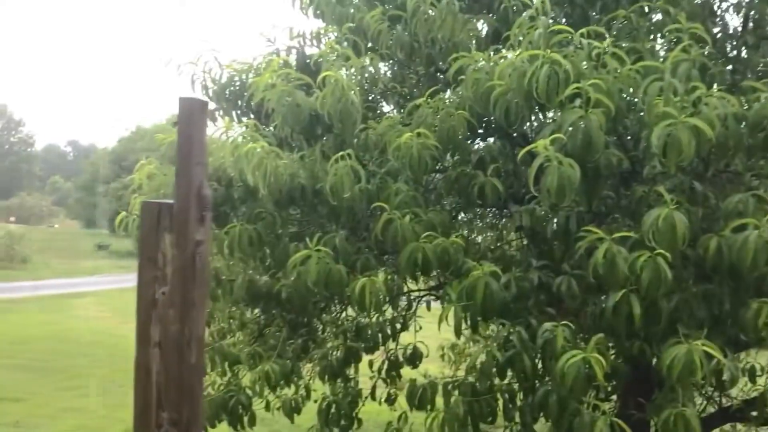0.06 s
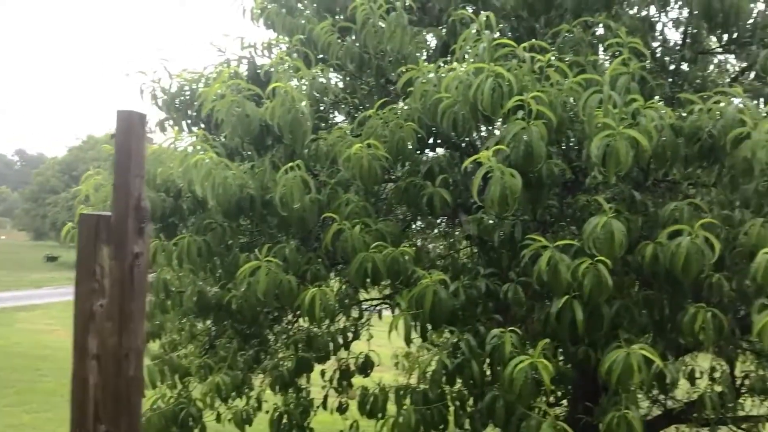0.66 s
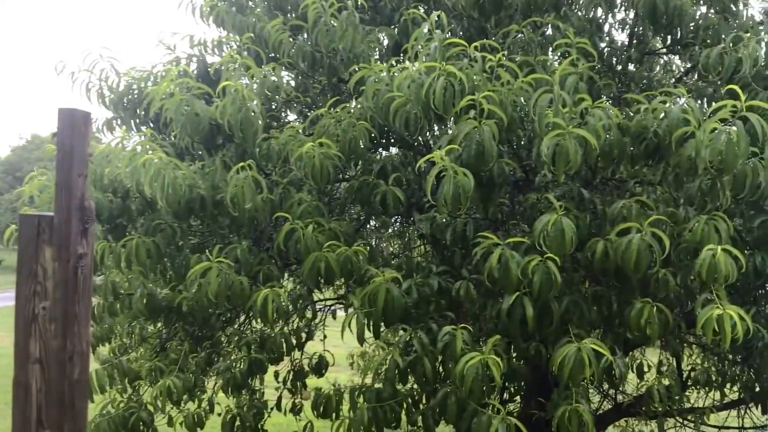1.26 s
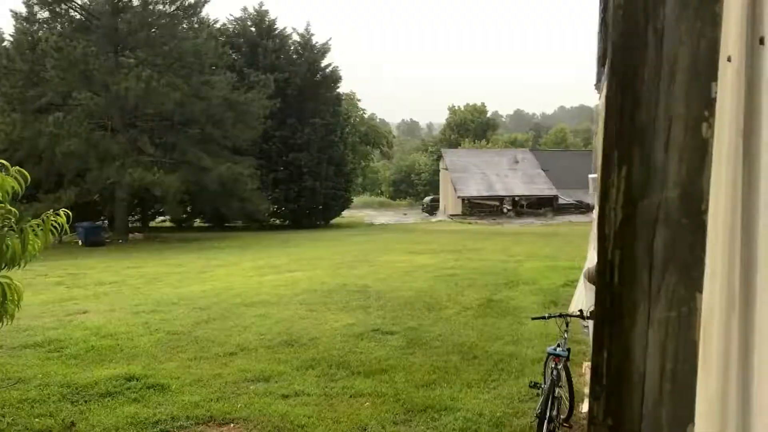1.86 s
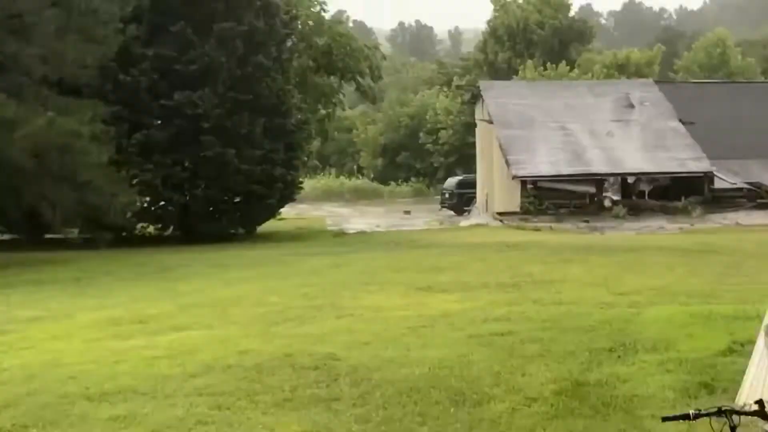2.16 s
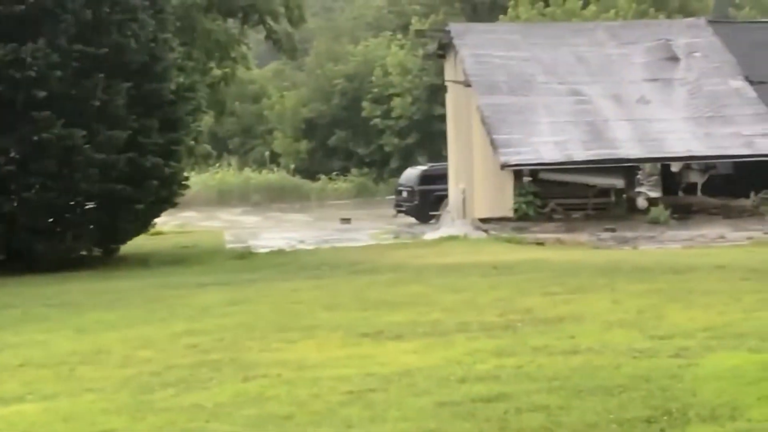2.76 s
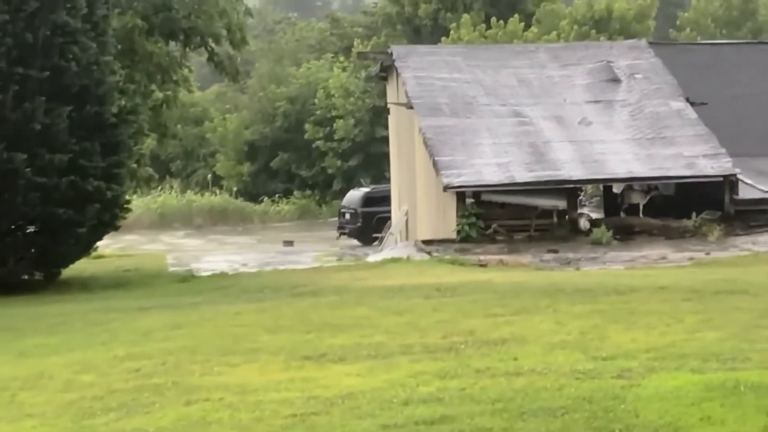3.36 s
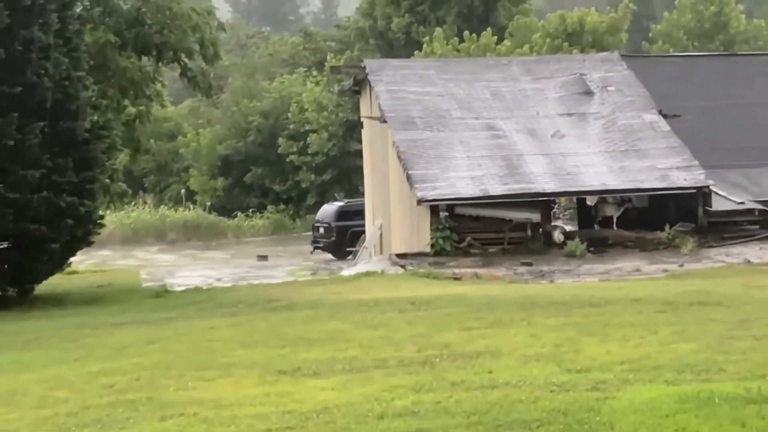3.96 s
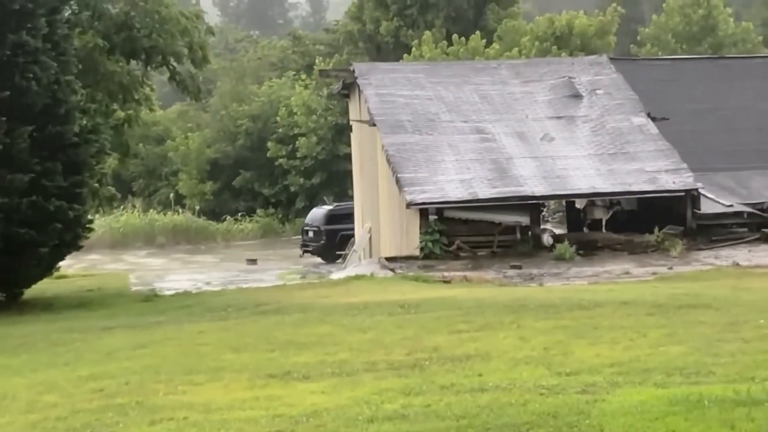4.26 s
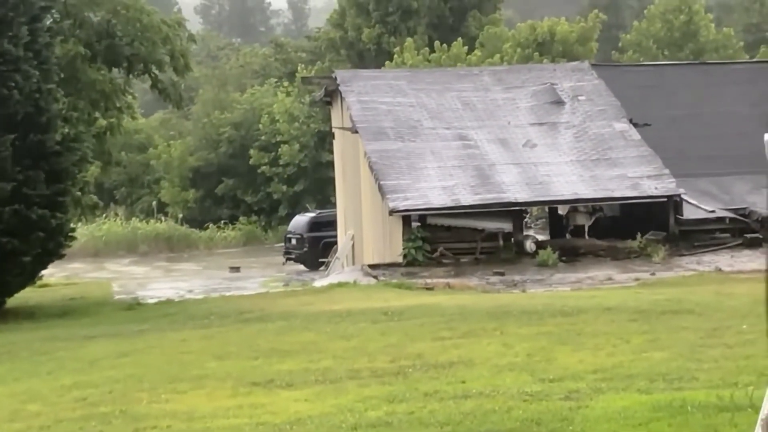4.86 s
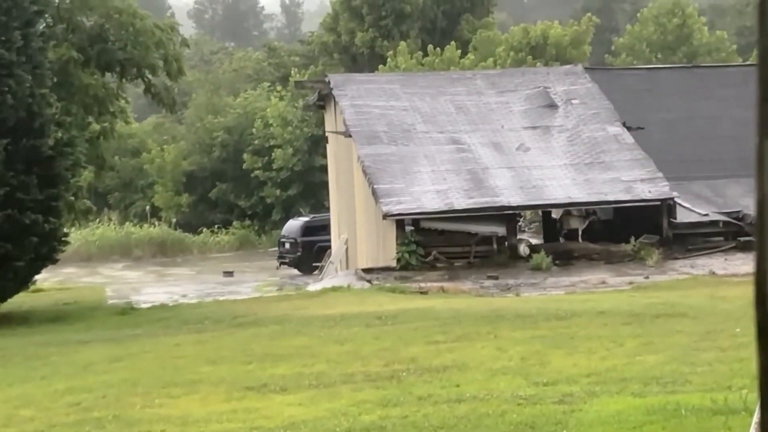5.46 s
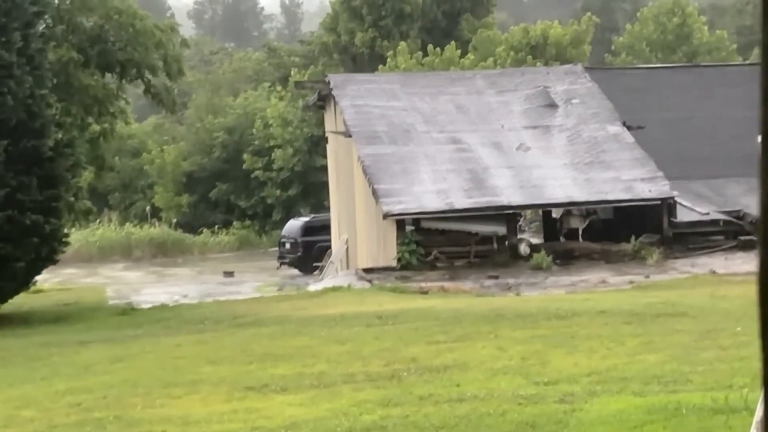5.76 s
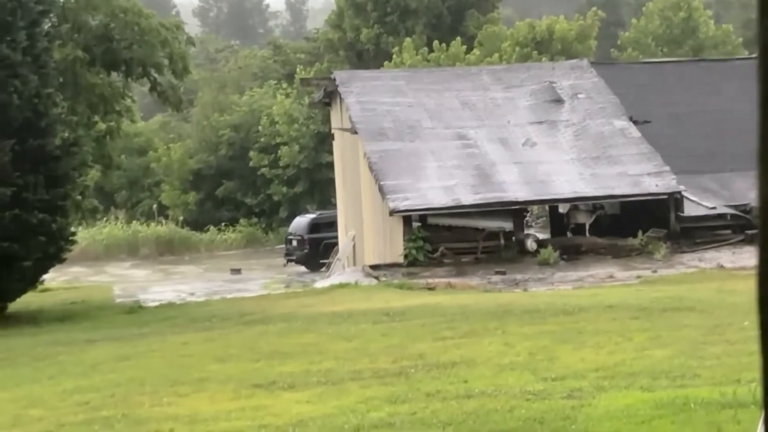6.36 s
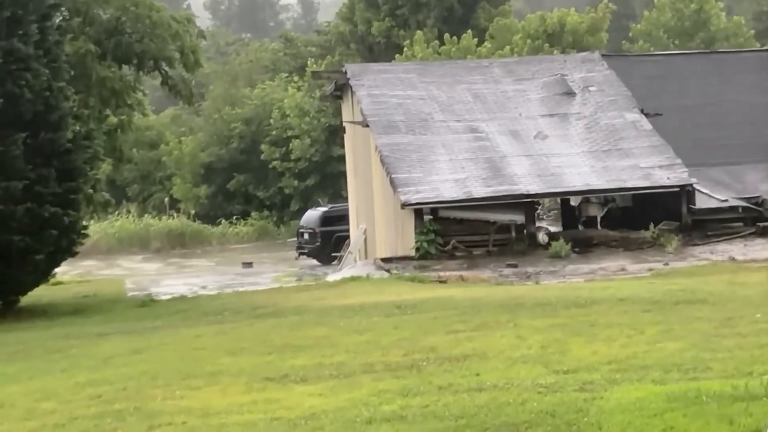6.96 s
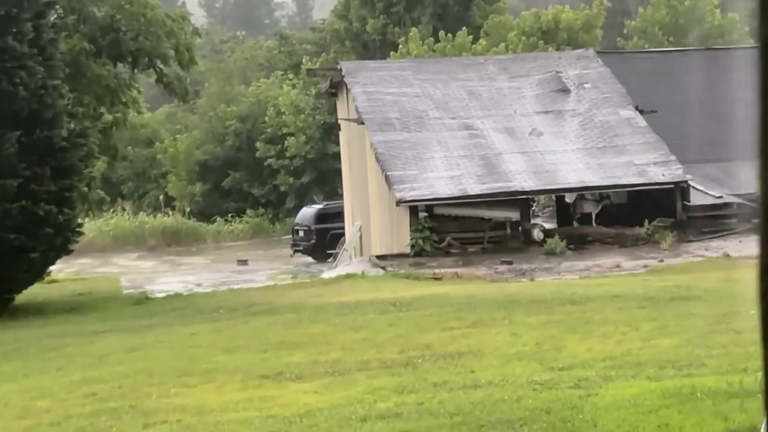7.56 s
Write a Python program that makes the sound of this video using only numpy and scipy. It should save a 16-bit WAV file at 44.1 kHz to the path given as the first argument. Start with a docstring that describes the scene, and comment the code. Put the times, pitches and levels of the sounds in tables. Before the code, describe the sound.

Even rainfall on a tree and lawn, near drips ticking over low wind rumble and a faint machine hum, cutting out once.

```python
"""Steady rain on a yard, in mono from beside a house. From the start: a wash of far drops, hiss from a
leafy tree, a low rumble that swells with each gust, a faint machine hum. Near drops splat on leaves and
tap on wood; from 0.7 s eddies bump the microphone. From 1.8 s the rain stutters at times with a brief
glassy ring. Just before 1.9 s the sound drops out; it returns facing the open lawn, with less hiss,
more splatter and more hum. At 6.5 s one big drop splashes close by."""
import sys
import numpy as np
from scipy.fft import rfft, irfft, next_fast_len
from scipy.io import wavfile
from scipy.ndimage import map_coordinates

SR = 44100
rng = np.random.default_rng(int(sys.argv[2]) if len(sys.argv) > 2 else 0)


def bounce(signal):
    """Save signal as a 16-bit WAV file at the path given by the first command-line argument."""
    frames = np.transpose(np.atleast_2d(signal))
    limited = np.clip(frames, -1, 1)
    pcm = np.round(limited * 32767).astype(np.int16)
    wavfile.write(sys.argv[1], SR, pcm)


N = 336042

# levels per direction: wash_db, hiss_db, splatter_db, hum_db, deep_rumble_db
TREE_LEVELS = (-51.5, -55.5, -83, -72, -56)
LAWN_LEVELS = (-52.5, -58, -64.5, -55, -57.5)
# spectra: freq_hz, relative_db
WASH_SPECTRUM = [(150, -22), (350, -5.5), (520, -6.5), (700, -3), (1000, -2), (1500, -3.5), (2400, -7.2),
                 (4000, -10.5), (7000, -24), (16000, -26.5)]
HISS_SPECTRUM = [(800, -23), (2000, -7), (4400, 1.5), (4950, -3), (5500, 1.5), (6600, 2.5), (7600, -1),
                 (8600, 0.5), (9800, -2), (10500, -6.5), (11200, -2.5), (13000, -4.5), (15000, -7),
                 (16000, -5.5)]
SPLATTER_SPECTRUM = [(1200, -21), (1900, -5), (2500, -0.5), (3000, -5), (4500, -25)]
RUMBLE_SPECTRUM = [(40, -52), (65, -1), (88, -0.5), (130, -3.5), (165, -6), (200, -7), (250, -12.5),
                   (310, -13), (400, -21), (700, -47), (1500, -76)]
DEEP_SPECTRUM = [(20, -15), (30, -15), (42, 8), (58, 2), (75, 5), (120, -60), (400, -80)]
SPRAY_SPECTRUM = [(500, -40), (2600, -18), (3400, 2), (4500, 4), (5200, -3), (6500, 2.5), (7700, -5),
                  (8800, 4), (10400, -13), (11500, -4), (16000, -10)]
# wind gusts: peak_s, rise_db, width_s, deep_rise_db
WIND_GUSTS = [(0.003, 6.5, 0.12, 9), (0.727, 2, 0.26, -2), (1.153, 5, 0.29, -2), (1.683, 1, 0.14, -1),
              (2.672, 4.3, 0.34, 6.5), (3.096, 6, 0.41, 6), (5.5, 5, 0.57, 7), (7.55, 4, 0.3, 8)]
# machine hum lines: pitch_hz, relative_db
HUM_LINES = [(59.2, -2), (118, -6.5), (990, -20.5)]
# nearest drops on leaves: start_s, peak_db, centre_hz, t60_s
LEAF_SPLATS = [(0.462, -44, 7960, .02), (0.5212, -34, 11400, 0.029), (0.5935, -41, 6460, 0.0088),
               (0.843, -40, 9610, 0.048), (0.8665, -38, 8000, .014), (0.93, -44, 9000, .03),
               (1.0812, -39.5, 14100, .012), (1.339, -46, 9500, .018), (1.491, -40, 13000, .013),
               (1.694, -44, 8500, .02), (2.8442, -41, 7800, .016), (2.891, -44, 8000, .025),
               (3.2862, -42, 8440, .018), (3.485, -45, 8500, .02), (3.722, -48, 7800, .06),
               (3.7495, -43, 7400, 0.029), (3.9646, -41, 8610, .02), (4.1487, -41, 9200, .016),
               (4.423, -38.5, 10000, .024), (4.598, -42, 8600, .014), (4.865, -43, 9000, .025),
               (4.978, -44, 7300, .014), (5.0287, -44, 13000, .018), (5.127, -43, 9000, .02),
               (5.443, -42, 9000, .014), (5.764, -43, 5470, .025), (5.832, -41, 6500, .014),
               (5.9565, -43, 7200, .025), (6.0917, -38, 7000, .012), (6.279, -44, 8100, .028),
               (6.3124, -40.5, 9500, 0.028), (6.7023, -41, 9500, .013), (6.7248, -46, 6500, 0.012),
               (6.887, -42, 9400, .016), (6.9283, -43, 6900, .013), (7.0715, -40, 8200, .013),
               (7.1674, -40, 12300, .025), (7.409, -42, 13100, .03), (7.5755, -44, 9000, 0.013)]
# heavy drops on wood: start_s, level_db, pitch_hz
WOOD_TAPS = [(0.449, -32, 970), (0.911, -36, 920), (0.955, -41, 1220), (1.193, -37, 1060),
             (3.612, -32.5, 1090), (3.908, -34, 1030), (4.69, -37, 1190), (4.946, -40, 972),
             (7.206, -36.5, 1000)]
# eddies on the microphone: peak_s, level_db, centre_hz, width_s
EDDIES = [(0.70, -49, 160, 0.12), (0.80, -49, 91, 0.12), (1.0, -50, 89.5, 0.13), (1.18, -44, 90, 0.1),
          (1.67, -47.5, 94.8, 0.13), (2.08, -49, 107, 0.19), (2.32, -54, 164, 0.11),
          (2.62, -44, 55.6, 0.12), (2.67, -46, 151, 0.073), (2.79, -45, 146, 0.074), (3.07, -49, 165, 0.11),
          (3.41, -46.5, 85, 0.11), (3.59, -47.5, 87.5, 0.14), (4.28, -51.5, 146, 0.14),
          (6.03, -50, 60, 0.059), (7.57, -52.5, 115, 0.2)]
# glassy stutters: centre_s, hiss_edge_hz, width_s, hiss_gain_db, wash_gain_db, ring_db
RAIN_STUTTERS = [(1.777, 2780, 0.02, -14, -7, -65), (1.965, 3000, 0.018, -10, 0, -61.5),
                 (2.012, 2000, 0.014, -18, -9, -62), (3.013, 2220, 0.021, -30, -13, -62),
                 (4.380, 2800, 0.02, -15, -5, -62), (4.668, 2000, 0.032, -28, -27, -58),
                 (4.932, 2400, 0.017, -11, -8, -60), (5.339, 2200, 0.02, -19, -6, -62),
                 (5.658, 2820, 0.014, -10, -12, -59.5), (5.742, 1700, 0.02, -19, -15, -60.5),
                 (6.167, 3200, 0.017, -17, -9, -60.5), (6.6, 2800, 0.02, -8, -11, -61),
                 (6.748, 3200, 0.014, -10, -10, -57), (7.002, 3000, 0.02, -19, -8, -60)]
# one big drop, then its spray: start_s, level_db, t60_s
SPLASH_STAGES = [(6.5047, -34.3, .022), (6.5125, -47, 0.06), (6.52, -54.5, 0.18)]

BREEZE_DB, EASING_DB_PER_S = -50, 0.76
TAP_T60_S, FALL_BACK_S, FALL_BACK_DB = 0.019, 0.01, -13
RING_LOW_HZ, RING_HIGH_HZ, RING_CROWDING = 933, 8120, 2.1
RING_WIDTH_S, RING_DB_PER_OCTAVE = 0.041, -4.5
CUT_S, BACK_S, CUT_DB, SILENT_DB = 1.838, 1.942, -16.5, -37
FADE_OUT_DB_PER_S, FADE_IN_DB_PER_S = 902, 1102
RUMBLE_EDGE_HZ, TOP_HZ = 340, 15800


def amp(db):
    """Decibels to gain."""
    return 10 ** (np.asarray(db) / 20)


def unit(x):
    """Scale to rms 1."""
    return x / np.sqrt(np.mean(x ** 2) + 1e-20)


def wobble(rate_hz):
    """Smooth random curve, rate_hz knots a second."""
    knots = rng.standard_normal(int(N * rate_hz / SR) + 4)
    return map_coordinates(knots, [np.arange(N) * rate_hz / SR])


def bell(offset, width):
    """Gaussian, peak 1, full width taken at 1/e."""
    return np.exp(-(2 * offset / width) ** 2)


def filtered(x, response):
    """Zero-phase filter with gain response(hz)."""
    size = next_fast_len(len(x) + 8192)
    return irfft(rfft(x, size) * response(np.fft.rfftfreq(size, 1 / SR)), size)[:len(x)]


def highpass(x, corner_hz):
    """Steep high-pass."""
    return filtered(x, lambda hz: 1 - 1 / (1 + (hz / corner_hz) ** 8))


def coloured(x, spectrum):
    """Shape x by a spectrum on a log frequency axis; rms 1."""
    freq_hz, db = np.transpose(spectrum)
    return unit(filtered(x, lambda hz: amp(np.interp(np.log(hz + 1), np.log(freq_hz), db))))


def add(track, start_s, sound):
    """Mix a short sound into the track."""
    part = track[max(round(start_s * SR), 0):][:len(sound)]
    part += sound[:len(part)]


def drops(count, low_hz, high_hz, decay_cycles, spread_db, samples):
    """Tiny damped rings at random times, many faint, few strong; rms 1."""
    when, pitch, strength, phase = rng.random((count, 4)).T[:, :, None]
    hz = low_hz * (high_hz / low_hz) ** pitch
    cycles = hz * np.arange(samples) / SR
    gain = amp(-spread_db * np.log(1 - .98 * strength)) * np.sqrt(hz)
    rings = gain * np.exp(-cycles / decay_cycles) * np.sin(2 * np.pi * (cycles + phase))
    index = (when * N).astype(int) + np.arange(samples)
    return unit(np.bincount(index.ravel(), rings.ravel(), N + samples)[:N])


def rain(wash_db, hiss_db, splatter_db):
    """Far drops merge into noise; nearer ones patter, plink in puddles, tick and splatter."""
    patter = drops(count=4500, low_hz=499, high_hz=4140, decay_cycles=1.8, spread_db=1, samples=400)
    plinks = drops(count=1100, low_hz=695.6, high_hz=9035, decay_cycles=41, spread_db=1.5, samples=2400)
    ticks = drops(count=6000, low_hz=3530, high_hz=15300, decay_cycles=2, spread_db=6, samples=120)
    wash = coloured(rng.standard_normal(N) + amp(-13) * patter + amp(-12.5) * plinks, WASH_SPECTRUM)
    hiss = coloured(rng.standard_normal(N) + amp(-9.5) * ticks, HISS_SPECTRUM)
    splatter = drops(count=3000, low_hz=1708, high_hz=3300, decay_cycles=9.6, spread_db=2.5, samples=800)
    return (amp(wash_db + 0.48 * wobble(rate_hz=11)) * wash
            + amp(hiss_db + 0.21 * wobble(rate_hz=12)) * hiss
            + amp(splatter_db) * coloured(splatter, SPLATTER_SPECTRUM))


def wind_rumble(deep_db):
    """Low wind noise round the house: gusts swell over a dying breeze."""
    t = np.arange(N) / SR
    body_db = BREEZE_DB - EASING_DB_PER_S * t
    for peak_s, rise_db, width_s, deep_rise_db in WIND_GUSTS:
        swell = bell(t - peak_s, width_s)
        body_db = body_db + rise_db * swell
        deep_db = deep_db + deep_rise_db * swell
    body = amp(body_db) * coloured(rng.standard_normal(N), RUMBLE_SPECTRUM)
    deep = amp(deep_db) * coloured(rng.standard_normal(N), DEEP_SPECTRUM)
    return body + deep


def machine_hum(rms_db):
    """A far machine runs at a slightly unsteady speed."""
    t = np.arange(N) / SR
    return sum(amp(rms_db + db) * np.sqrt(2) * np.sin(2 * np.pi * hz * t + 0.5 * wobble(rate_hz=4.4))
               for hz, db in HUM_LINES)


def splat(centre_hz, t60_s, octaves, attack_s):
    """A drop spreads and tears apart: a burst of band noise, peak 1."""
    t = np.arange(SR // 10) / SR
    noise = rng.standard_normal(len(t))
    fizz = filtered(noise, lambda hz: 1 / (1 + (np.log2((hz + 1) / centre_hz) / octaves) ** 2))
    burst = fizz * (1 - np.exp(-(t / attack_s) ** 2)) * amp(-60 * t / t60_s)
    return burst / np.abs(burst).max()


def leaf_splats(faint_count):
    """Near drops burst on leaves, with faint ones scattered between."""
    out = np.zeros(N)
    for start_s, peak_db, centre_hz, t60_s in LEAF_SPLATS:
        add(out, start_s, amp(peak_db) * splat(centre_hz, t60_s, octaves=0.83, attack_s=0.00083))
    for when, pitch, strength in rng.random((faint_count, 3)):
        faint = splat(centre_hz=5500 + 9000 * pitch, t60_s=0.04, octaves=0.16, attack_s=0.0082)
        add(out, when * N / SR, amp(-55.5 + 5.4 * strength) * faint)
    return out


def wood_taps():
    """Heavy drops give a dead tap with a wet edge; the water thrown up lands just after."""
    out, t = np.zeros(N), np.arange(SR // 10) / SR
    for start_s, level_db, pitch_hz in WOOD_TAPS:
        ring = np.sin(2 * np.pi * pitch_hz * t) * amp(-60 * t / TAP_T60_S) * (1 - np.exp(-t / 0.0008))
        wet_edge = splat(1.1 * pitch_hz, t60_s=0.047, octaves=0.93, attack_s=0.0017)
        fall_back = splat(0.59 * pitch_hz, t60_s=0.051, octaves=0.7, attack_s=0.004)
        add(out, start_s, amp(level_db - 1.5) * ring + amp(level_db - 7) * wet_edge)
        add(out, start_s + FALL_BACK_S, amp(level_db + FALL_BACK_DB) * fall_back)
    return out


def buffets(octaves):
    """Eddies strike the microphone: short, dull bumps of narrow noise."""
    out, t = np.zeros(N), np.arange(-SR // 4, SR // 4) / SR
    for peak_s, level_db, centre_hz, width_s in EDDIES:
        noise = rng.standard_normal(len(t))
        eddy = filtered(noise, lambda hz: np.exp(-(np.log2((hz + 1) / centre_hz) / octaves) ** 2))
        swell = bell(t, width_s)
        bump = unit(eddy * swell) * np.sqrt(np.mean(swell ** 2))
        add(out, peak_s + t[0], amp(level_db) * bump)
    return out


def glassy_ring(t, count):
    """Unrelated tones, crowded toward the low end, swell and fade round t = 0."""
    jitter, phase = rng.random((count, 2)).T[:, :, None]
    position = (np.arange(count)[:, None] + jitter) / count
    hz = RING_LOW_HZ * (RING_HIGH_HZ / RING_LOW_HZ) ** (position ** RING_CROWDING)
    tones = amp(RING_DB_PER_OCTAVE * np.log2(hz / RING_LOW_HZ)) * np.sin(2 * np.pi * (hz * t + phase))
    return np.sqrt(2) * tones.sum(axis=0) * bell(t, RING_WIDTH_S)


def stutter(x):
    """Hiss and wash dip briefly and glassy tones ring in their place; the rumble carries on."""
    out, t = x.copy(), np.arange(-SR // 20, SR // 20) / SR
    for centre_s, hiss_edge_hz, width_s, hiss_gain_db, wash_gain_db, ring_db in RAIN_STUTTERS:
        start_s = centre_s + t[0]
        segment = x[round(start_s * SR):][:len(t)]
        highs = highpass(segment, hiss_edge_hz)
        mids = highpass(segment, RUMBLE_EDGE_HZ) - highs
        dip = 1 / (1 + np.abs(2 * t / width_s) ** 5)
        lost = (1 - amp(hiss_gain_db)) * highs + (1 - amp(wash_gain_db)) * mids
        add(out, start_s, amp(ring_db) * glassy_ring(t, count=8) - dip * lost)
    return out


def dropout():
    """Gain curve: steps down, dies to silence, fades back in."""
    t = np.arange(N) / SR
    leaving_db = np.where(t < CUT_S, 0, CUT_DB - FADE_OUT_DB_PER_S * (t - CUT_S))
    returning_db = np.minimum(FADE_IN_DB_PER_S * (t - BACK_S), 0)
    gain_db = np.maximum(leaving_db, returning_db)
    return np.where(gain_db > SILENT_DB, amp(gain_db), 0)


def splash():
    """A big drop breaks close by: a bright smack, then a soft tail of falling spray."""
    envelope, t = np.zeros(N), np.arange(SR // 4) / SR
    for start_s, level_db, t60_s in SPLASH_STAGES:
        add(envelope, start_s, amp(level_db - 60 * t / t60_s) * (1 - np.exp(-t / 0.00044)))
    return envelope * coloured(rng.standard_normal(N), SPRAY_SPECTRUM)


def scene():
    """One microphone on both channels, facing the tree, then the lawn."""
    facing_lawn = np.arange(N) / SR > (CUT_S + BACK_S) / 2
    wash_db, hiss_db, splatter_db, hum_db, deep_db = (
        np.where(facing_lawn, lawn_db, tree_db) for tree_db, lawn_db in zip(TREE_LEVELS, LAWN_LEVELS))
    water = rain(wash_db, hiss_db, splatter_db) + leaf_splats(faint_count=110) + wood_taps() + splash()
    wind = wind_rumble(deep_db) + buffets(octaves=0.43)
    yard = water + wind + machine_hum(hum_db)
    return np.array([yard, yard])


def record(dry):
    """Stutters, one dropout, then a band limit."""
    mono = stutter(dry[0]) * dropout()
    mono = filtered(mono, lambda hz: hz < TOP_HZ)
    return np.array([mono, mono])


dry = scene()
out = record(dry)
bounce(out)
```